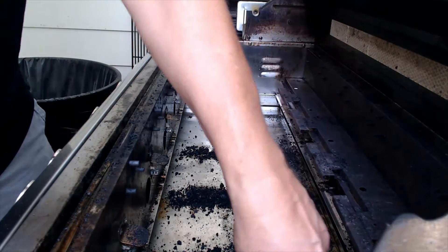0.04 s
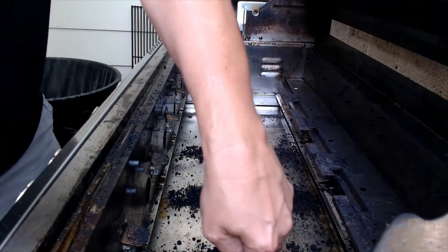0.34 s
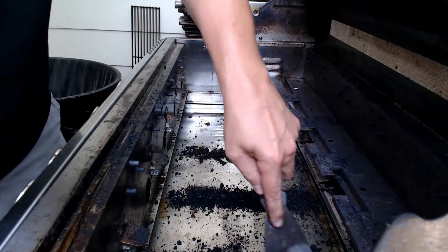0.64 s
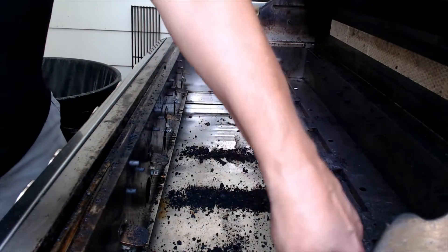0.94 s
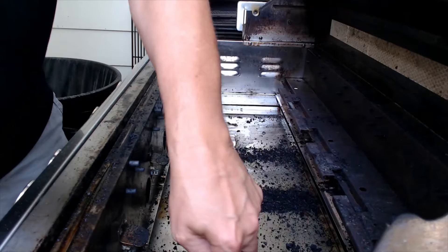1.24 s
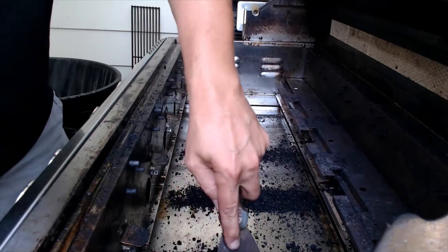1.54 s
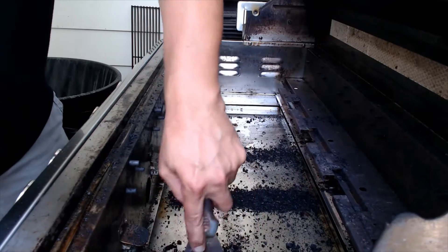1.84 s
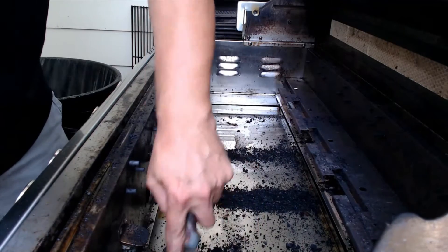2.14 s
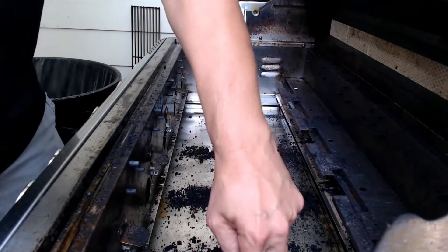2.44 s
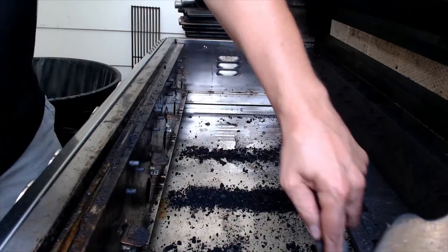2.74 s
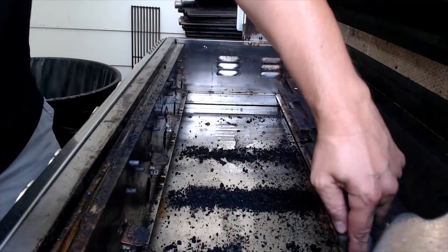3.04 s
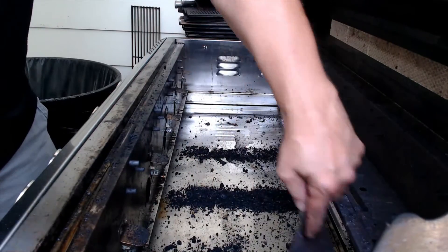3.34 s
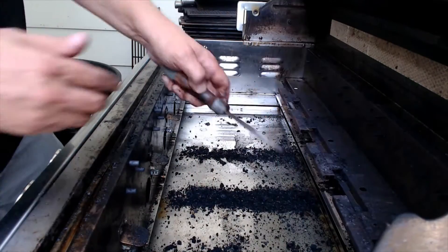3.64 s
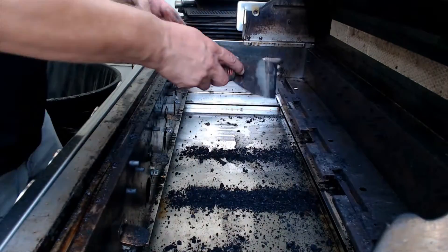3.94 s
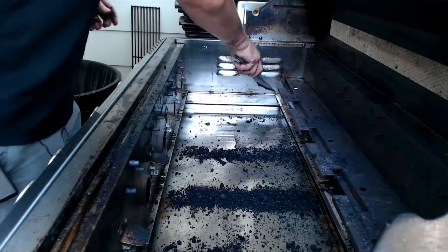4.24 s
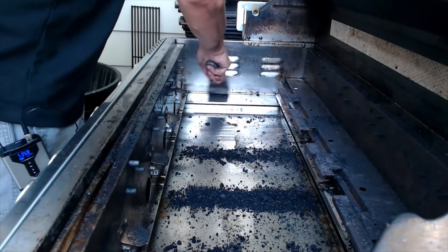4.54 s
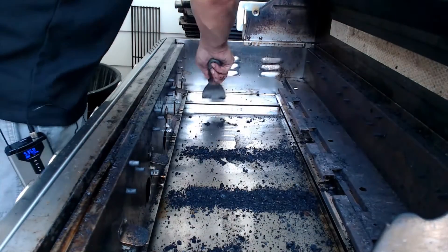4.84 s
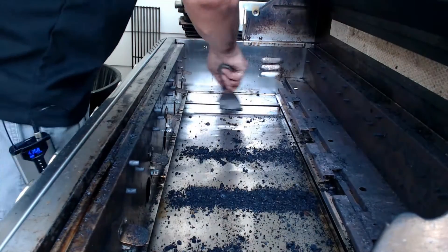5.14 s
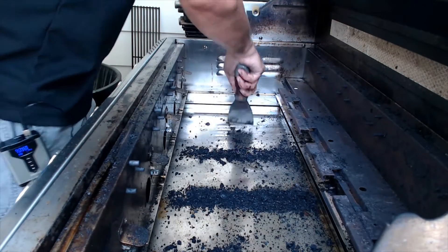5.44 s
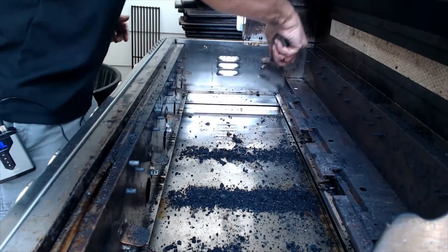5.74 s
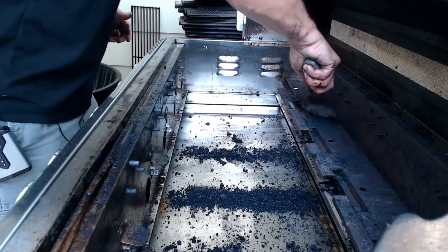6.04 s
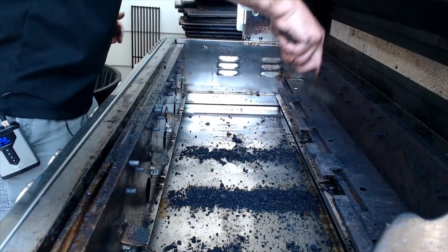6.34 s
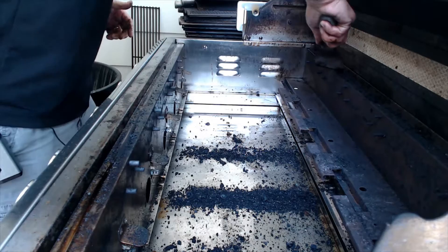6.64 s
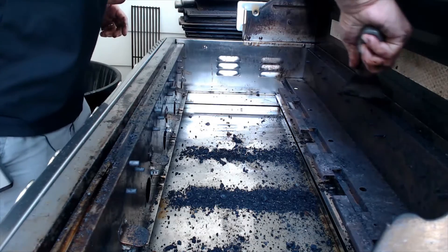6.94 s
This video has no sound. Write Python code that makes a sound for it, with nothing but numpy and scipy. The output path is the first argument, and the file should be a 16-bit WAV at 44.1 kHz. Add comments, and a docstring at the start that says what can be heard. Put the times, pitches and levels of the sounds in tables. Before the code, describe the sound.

Heard close up inside a grill's metal firebox, a scraper blade clanks down and pushes through dry crust in light, irregular, gritty strokes. It stops for about a second, then returns with sharper clanks, hollow booming thumps and finally loud, longer grinding against the wall. Loose crumbs tick into the pan over a faint hum and soft background air.

```python
"""A steel scraper works crusted grease off the inside of a grill, close up.
The blade lands with a clank, then grinds forward in tiny slips that shake the sheet-metal firebox
while crumbs crackle at its edge. Light strokes on the floor pan give way to hard ones on the side wall.
Underneath lie soft air noise, a faint hum and a low rumble as the body shifts."""
import sys
import numpy as np
from scipy import signal
from scipy.fft import irfft, next_fast_len
from scipy.io import wavfile

SR = 44100
rng = np.random.default_rng(int(sys.argv[2]) if len(sys.argv) > 2 else 0)


def master(y):
    """Save y as 16-bit WAV."""
    cut = np.clip(np.atleast_2d(y).T, -1, 1)
    pcm = np.round(cut * 32767)  # scale
    wavfile.write(sys.argv[1], SR, pcm.astype(np.int16))


N = 312669
RING_SAMPLES, CUTOFF_HZ = 32768, 15850

# ringing modes of the firebox, the blade and the slowly flexing panel: pitch_hz, level_db, t60_s
BOX_MODES = [(557, -4, 1), (622, 7.5, 0.76), (658, -8.5, 0.59), (707.5, 12.5, 0.39), (794, 2.5, 0.74),
             (906, 9, 0.3), (1009, 4.5, 0.58), (1285, -3.5, 0.73), (1450, 1, 0.25), (1685, -8.5, 0.13),
             (2540, -3, 0.084)]
BLADE_MODES = [(2676, 2, 0.11), (4030, 4, 0.047), (5120, -9.5, 0.04), (6220, 1.5, 0.03), (6900, -13, 0.04),
               (8030, -1, 0.049), (9860, 1, 0.022)]
PANEL_MODES = [(121.3, -9, 1.35), (181.6, 0.5, 0.66), (265.7, 4.5, 0.39), (361, -1, 0.71),
               (422, 14.5, 0.077), (460, 1.5, 0.65)]
# tone colour of the wall's dense modes, the panel's thump and cracking crust: frequency_hz, level_db
WALL_COLOUR = [(100, -31), (300, 0.5), (500, 5), (700, 7.5), (950, 2), (1350, 4.5), (1750, -6.5),
               (2700, -14.5), (4300, -20.5), (7000, -28), (15000, -39)]
THUMP_COLOUR = [(50, -12), (100, 4.5), (190, 9), (340, 5.5), (480, -21.5), (1000, -12.5), (3000, -38.5)]
CRUST_COLOUR = [(600, -43), (1500, 8.5), (2700, 9.5), (4200, 7.5), (5500, 4), (7800, 1), (10300, -5),
                (15500, -15.5)]


def amp(db):
    """Decibels to gain."""
    return 10 ** (np.asarray(db) / 20)


def unit(x):
    """Scales to rms 1."""
    return x / np.sqrt(np.mean(x ** 2) + 1e-20)


def read(points, hz):
    """Reads a table on a log-frequency axis."""
    f, value = np.transpose(points)
    return np.interp(np.log(hz + 1), np.log(f + 1), value)


def add(mix, start_s, sound):
    """Mixes a sound in at start_s."""
    part = mix[max(round(start_s * SR), 0):][:len(sound)]
    part += sound[:len(part)]


def ramp(x):
    """A smooth fade-in as x goes from 0 to 1."""
    return np.sin(np.pi / 2 * np.clip(x, 0, 1)) ** 2


def wander(step_s):
    """A random drift that glides to a new value every step."""
    knots = rng.standard_normal(2048)
    return np.interp(np.arange(N) / SR / step_s, np.arange(len(knots)), knots)


def noise(colour):
    """Steady coloured noise of rms 1."""
    hz = np.fft.rfftfreq(2 * next_fast_len(N // 2 + 1, True), 1 / SR)
    phases = np.exp(2j * np.pi * rng.random(len(hz)))
    return unit(irfft(amp(read(colour, hz)) * phases)[:N])


def metal(colour, modes, early_t60, tail_db, modes_db):
    """Returns a maker of impulse responses: each spot on the metal rings a little differently."""
    # ring time of the box: frequency_hz, t60_s
    ring_times = [(100, 0.34), (260, 1.53), (700, 0.78), (2000, 0.52), (13000, 0.37)]
    t = np.arange(RING_SAMPLES) / SR
    hz = np.fft.rfftfreq(RING_SAMPLES, 1 / SR)
    band_hz = np.geomspace(100, 13000, 6)
    crossovers = [np.interp(np.log(hz + 1), np.log(band_hz), row) for row in np.eye(len(band_hz))]
    bands = amp(read(colour, hz)) * crossovers
    # the contact's own burst dies fast; the box rings on, longest in the low mids
    decay = amp(-60 * t / early_t60) + amp(tail_db - 60 * t / read(ring_times, band_hz)[:, None])
    tones = np.array([amp(db - 60 * t / t60) * np.sin(2 * np.pi * f * t) for f, db, t60 in modes])
    cluster_hz = np.geomspace(1500, CUTOFF_HZ, 60)

    def spot():
        """One spot's ring: clear tones over a dense wash whose high modes bunch at random."""
        ripple = amp(np.interp(hz, cluster_hz, rng.uniform(-6, 6, len(cluster_hz)), left=0))
        phases = np.exp(2j * np.pi * rng.random(len(hz)))
        wash = (irfft(bands * ripple * phases) * decay).sum(0)
        polarity = rng.choice([-1, 1], len(modes))
        return unit(unit(wash) + amp(modes_db) * unit(polarity @ tones)) / np.sqrt(RING_SAMPLES)
    return spot


def hand():
    """Each stroke bears down, digs in, reaches out over stiffer metal and flicks free."""
    # pushes of the scraper, with pressure given at mid-stroke and the wall's pitch at full reach:
    # start_s, length_s, pressure_db, pressure_change_db, bite_db, flick_db, far_pitch_hz
    strokes = [(-0.03, 0.28, -32.5, -17, -52.5, -52, 680), (0.3, 0.15, -28.5, 6.5, -48, -32.5, 1000),
               (0.875, 0.26, -23, 6.5, -39, -67, 1150), (1.124, 0.205, -36, 0, -45.5, -38, 805),
               (1.653, 0.097, -32.5, -12, -40.5, -46, 800), (1.873, 0.088, -19, -13, -49, -34.5, 734),
               (1.954, 0.13, -22, -7, -31.5, -33.5, 674), (2.282, 0.064, -21.5, 10, -36, -62, 686),
               (2.349, 0.13, -29, -9, -45, -39.5, 616), (2.744, 0.151, -32.5, -18.5, -40, -39.5, 710),
               (3.121, 0.13, -27, -10, -39, -37.5, 935), (4.234, 0.21, -25.5, -2.5, -33.5, -41, 880),
               (4.411, 0.15, -43, -5, -42.5, -41, 760), (4.541, 0.1, -20, -7.5, -28, -27, 1380),
               (4.849, 0.061, -18, -8, -38, -31, 766), (5.164, 0.11, -28.5, -10, -43, -35, 630),
               (5.798, 0.36, -10.5, -8, -20.5, -55, 1220), (6.476, 0.65, -10.5, 3, -25.5, -20, 970)]
    press_share, dig_share = 0.16, 0.23  # parts of a stroke spent bearing down and digging in
    ease_s, surface_s = 0.036, 0.11  # fade-outs: the edge leaves the crust before the hand lets go
    flick_lead_s, flick_s = 0.023, 0.015  # the edge skids free just before the end
    near_hz, reach_skew = 656, 2.2  # wall pitch at both ends of a stroke; full reach comes late
    t = np.arange(N) / SR
    push, bite, reach_hz = np.zeros((3, N))
    for start_s, length_s, pressure_db, change_db, bite_db, flick_db, far_hz in strokes:
        at = (t > start_s) & (t < start_s + length_s)
        done = (t[at] - start_s) / length_s
        left_s = start_s + length_s - t[at]
        pressure = amp(pressure_db + change_db * (done - .5))
        push[at] += pressure * ramp(done / press_share) * ramp(left_s / ease_s)
        bite[at] += amp(bite_db) * ramp(done / dig_share) * ramp(left_s / surface_s)
        bite[at] += amp(flick_db) * np.exp(-((left_s - flick_lead_s) / flick_s) ** 2)
        reach_hz[at] = (far_hz - near_hz) * np.sin(np.pi * done ** reach_skew)
    spot_hz = near_hz + reach_hz
    # the panel booms less where the wall is stiff and high-pitched
    boom = push * amp(-6.5 - 10.5 * np.log2(spot_hz / near_hz))
    return push, bite, boom, spot_hz


def slips(per_s, spread_db, clump_db, clump_s):
    """Stick and slip: random jerks of uneven size, bunched where the crust is lumpy."""
    chance, strength, sign = rng.random((3, N))
    sizes = amp(spread_db * np.minimum(-np.log(1 - strength), 4))
    jerks = (chance < per_s / SR) * np.sign(sign - .5) * sizes
    lumps = amp(clump_db * np.minimum(wander(clump_s), 1.2))
    return unit(jerks * lumps)


def travel(drive, spot, count, spots_per_s=9):
    """The edge moves along the metal, so the drive crossfades from one spot's ring to the next."""
    place = np.arange(N) / SR * spots_per_s
    out = np.zeros(N)
    for k in range(count):
        distance = np.abs((place - k + count / 2) % count - count / 2)
        crossfade = np.sqrt(np.maximum(1 - distance, 0))
        out += signal.oaconvolve(drive * crossfade, spot())[:N]
    return out


def spot_resonance(grind, spot_hz, width_hz):
    """The spot under the blade lifts a band that follows its pitch; the overall level stays."""
    carrier = np.exp(2j * np.pi * np.cumsum(spot_hz) / SR)
    pole = np.exp(-np.pi * width_hz / SR)
    band = 2 * (carrier * signal.lfilter([1 - pole], [1, -pole], grind / carrier + 1e-18)).real
    return unit(grind + band) * np.std(grind)


def squeal(modes, catch_db, catch_s, waver):
    """Friction catches now one mode, now another, and makes it sing for an instant."""
    out = np.zeros(N)
    for hz, db, _ in modes:
        cycles = np.cumsum(hz * (1 + waver * wander(catch_s / 4))) / SR
        swell = amp(db + catch_db * np.minimum(wander(catch_s), 2))
        out += swell * np.sin(2 * np.pi * cycles)
    return unit(out)


def crumbs(bite, fall_s, per_s):
    """Loosened crust keeps pattering into the pan after the edge has passed."""
    pole = np.exp(-1 / (fall_s * SR))
    loose = signal.lfilter([1 - pole], [1, -pole], bite)
    return loose * slips(per_s, spread_db=3, clump_db=2, clump_s=.02)


def scraping():
    """Slips shake the wall and the panel; finer crackle from the crust rings the blade."""
    wall = metal(WALL_COLOUR, BOX_MODES, early_t60=0.036, tail_db=-15, modes_db=-13.5)
    blade = metal(CRUST_COLOUR, BLADE_MODES, early_t60=0.061, tail_db=-20, modes_db=-7.5)
    panel = metal(THUMP_COLOUR, PANEL_MODES, early_t60=0.1, tail_db=-2, modes_db=3)
    push, bite, boom, spot_hz = hand()
    judder = slips(per_s=1100, spread_db=3, clump_db=1.35, clump_s=.012)
    crackle = slips(per_s=2500, spread_db=4, clump_db=6, clump_s=.006)
    crackle = unit(crackle + 0.5 * judder)  # each large slip also breaks crust
    grind = travel(push * judder, wall, count=6)
    grind = spot_resonance(grind, spot_hz, width_hz=350)
    singing = push * squeal(BOX_MODES, catch_db=7, catch_s=.04, waver=.006)
    patter = amp(-23) * crumbs(bite, fall_s=0.96, per_s=760)
    grit = travel(bite * crackle + patter, blade, count=7)
    shudder = travel(boom * judder, panel, count=4)
    return amp(-1.43) * grind + amp(-9) * singing + amp(0.46) * grit + amp(-3) * shudder


def background():
    """A bed of steady air and faint low hum, with a rumble that swells as the body shifts."""
    # tone colour of the air: frequency_hz, level_db
    air_colour = [(20, -5.5), (80, -16), (130, -12.5), (190, -20.5), (330, -19.5), (1150, -28), (2600, -44),
                  (6000, -52.5), (16000, -56)]
    # rise and fall of the rumble: time_s, relative_level_db
    rumble_swells = [(1.5, -54), (1.95, -36), (2.3, -48), (4.05, -46), (4.25, -28), (4.55, -51)]
    hum_hz = 78.7
    hum = noise([(hum_hz / 2.45, -60), (hum_hz, 0), (hum_hz * 1.58, -60), (1000, -120)])
    rumble = noise([(5, -34), (22, -18), (38, 1), (62, -18), (1000, -83)])
    swell_db = np.interp(np.arange(N) / SR, *np.transpose(rumble_swells))
    return amp(-44.5) * noise(air_colour) + amp(-45.5) * hum + amp(swell_db - 0.5) * rumble


def knocks():
    """The blade strikes the sheet: a clank, the edge's click and a slow thump of the panel."""
    # blade landings and snags: start_s, clank_db, click_db, thump_db, spot_pitch_hz
    hits = [(0.181, 9, -15, 5, 692), (0.209, 8, -8, -5, 798), (0.366, 5, 1.5, -5.5, 930),
            (0.832, -1, -50, 6.5, 622), (0.982, -1, 0, -10, 660), (1.185, 2.5, -7, -9, 750),
            (1.299, -1, 1, -21, 700), (1.589, 10, 0, 3.5, 700), (1.876, 14.5, 2.5, -6, 710),
            (2.291, 8, -25, 10, 680), (2.704, 3.5, -14, 6, 657), (2.778, 1, -6.5, -11, 656),
            (2.797, -1.5, -14, -5, 710), (3.082, -7, -20, 1.5, 780), (3.142, 3.5, -8, 3.5, 843),
            (4.193, -1, -15, 4.5, 740), (4.385, 12.5, 2, 1, 798), (4.551, 13, 7.5, -28, 1400),
            (4.835, 19, 15, -26, 885), (5.162, 6.5, -3, 12.5, 663), (5.429, 22, 12, 17, 630),
            (5.803, 18.5, 4, 5, 660), (6.067, 12.5, 11, 16.5, 554), (6.124, 12.5, -18, 14.5, 934),
            (6.445, 17, -2, 14, 912)]
    # single modes a blow leaves singing, high in the blade or low in the panel:
    # start_s, pitch_hz, level_db, t60_s
    pings = [(0.834, 264, -27, 0.47), (1.305, 3790, -38.5, 0.22), (1.877, 169.8, -21, 0.64),
             (1.877, 5120, -18, 0.051), (2.06, 4000, -33, 0.16), (5.428, 188, -23.5, 2.6),
             (6.124, 328, -19, 1.05)]
    wall = metal(WALL_COLOUR, BOX_MODES, early_t60=0.08, tail_db=-10, modes_db=-3)
    blade = metal(CRUST_COLOUR, BLADE_MODES, early_t60=0.037, tail_db=-28.5, modes_db=-12.5)
    panel = metal(THUMP_COLOUR, PANEL_MODES, early_t60=0.1, tail_db=0, modes_db=5)
    t = np.arange(RING_SAMPLES) / SR
    landing = 1 - np.exp(-(t / 0.0029) ** 2)  # a corner touches first, then the whole edge
    flexing = 1 - np.exp(-t / 0.01)  # the whole panel takes longer to get moving
    dent_db, dent_t60_s = -19.5, 0.067  # the struck spot swings, then passes its energy on
    out = np.zeros(N)
    for start_s, clank_db, click_db, thump_db, spot_hz in hits:
        dent = amp(dent_db - 60 * t / dent_t60_s) * np.sin(2 * np.pi * spot_hz * t)
        clank = amp(clank_db) * (dent + wall())
        click = amp(click_db) * blade()
        thump = amp(thump_db) * panel()
        add(out, start_s, landing * (clank + click) + flexing * thump)
    for start_s, pitch_hz, level_db, t60_s in pings:
        ping = amp(level_db - 60 * t / t60_s) * np.sin(2 * np.pi * pitch_hz * t)
        add(out, start_s, landing * ping)
    return out


def scene():
    """Strokes and knocks over the background, in mono."""
    return (scraping() + knocks() + background())[None]


def record(dry):
    """Soft-clips the loudest peaks at full scale, then trims the extreme treble."""
    rounded = dry / (1 + dry ** 8) ** (1 / 8)
    lowpass = signal.firwin(511, CUTOFF_HZ, window=("kaiser", 9), fs=SR)
    return signal.oaconvolve(rounded, lowpass[None], "same")


dry = scene()
out = record(dry)
master(out)
```